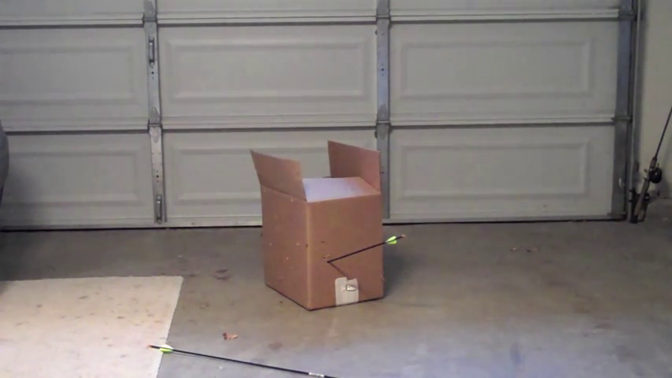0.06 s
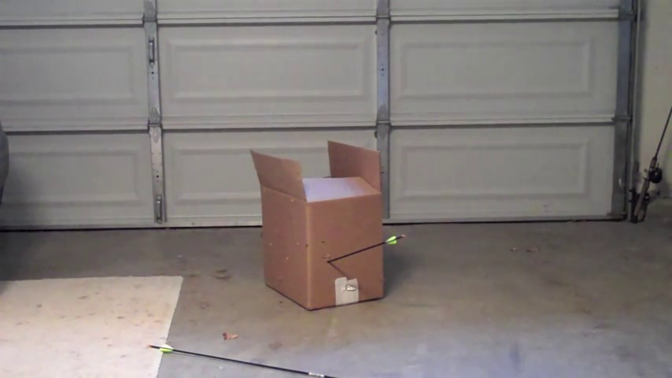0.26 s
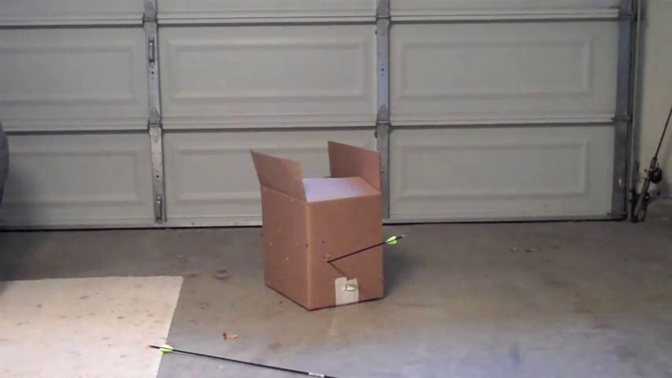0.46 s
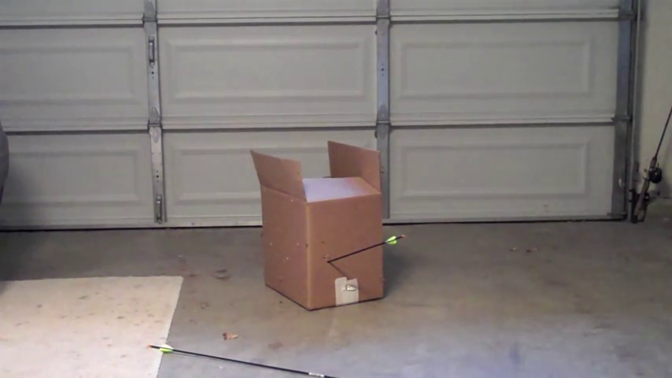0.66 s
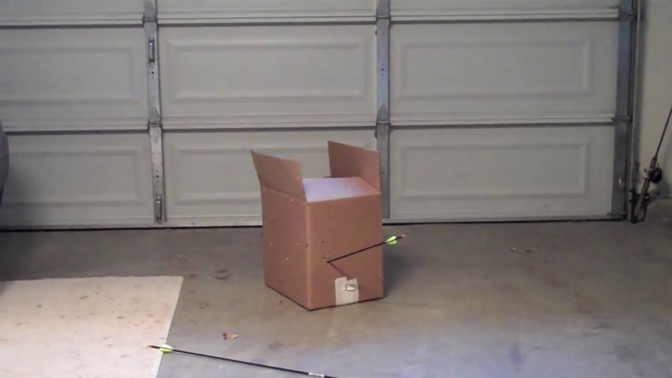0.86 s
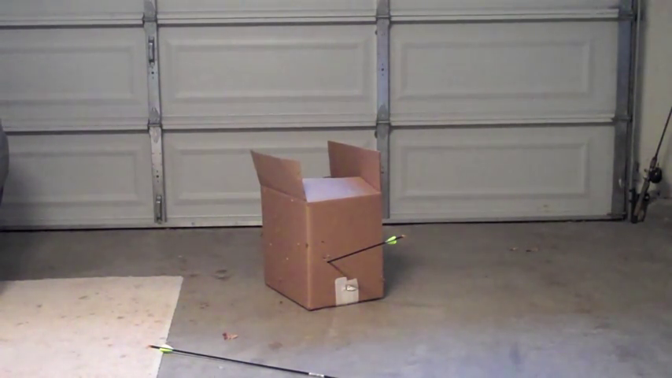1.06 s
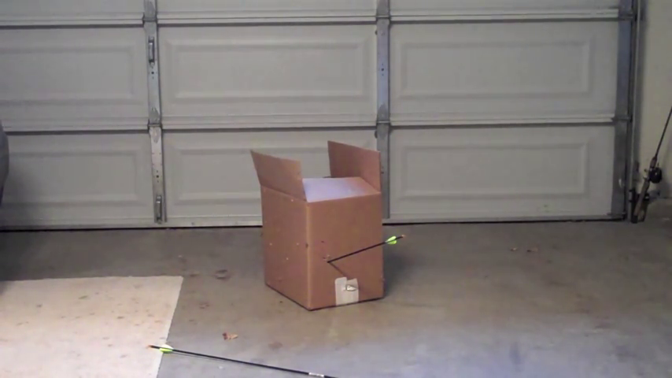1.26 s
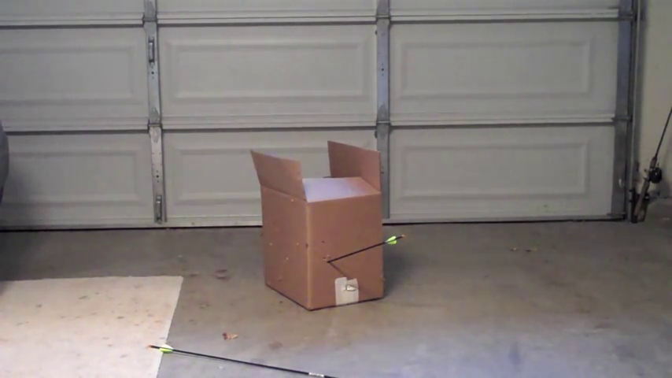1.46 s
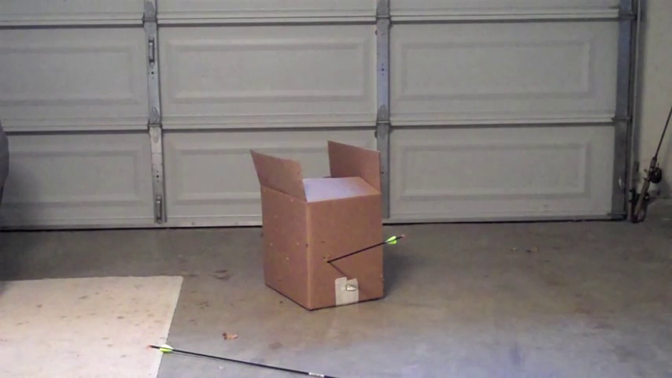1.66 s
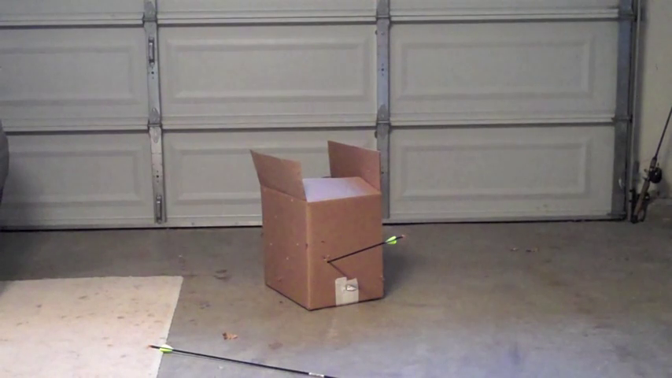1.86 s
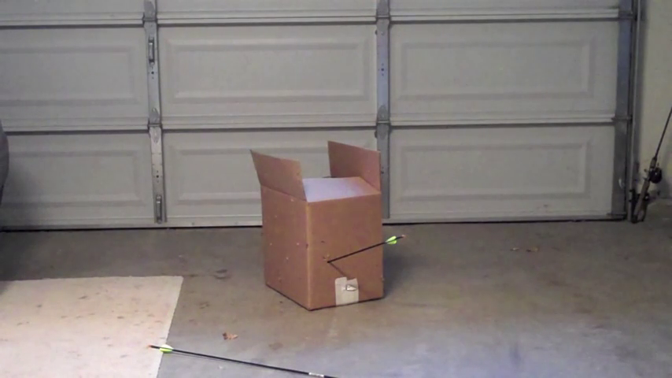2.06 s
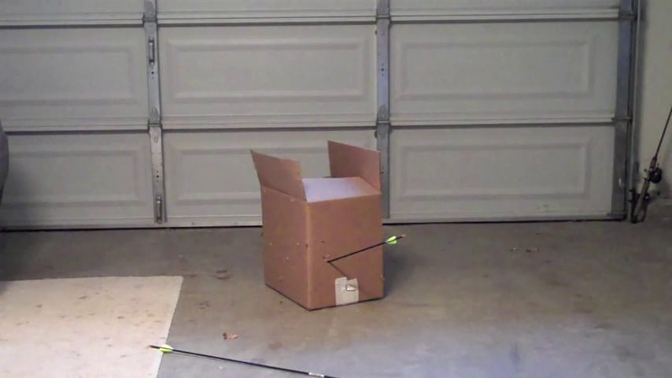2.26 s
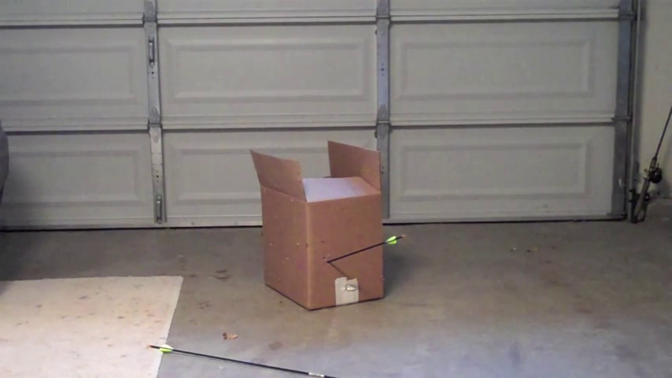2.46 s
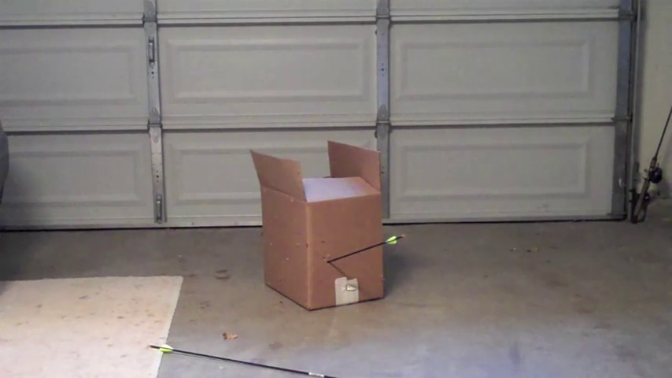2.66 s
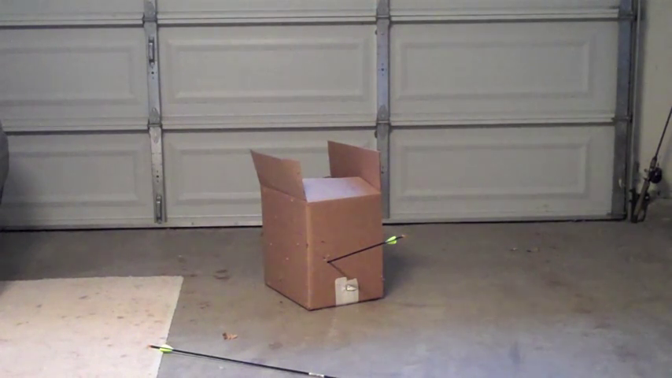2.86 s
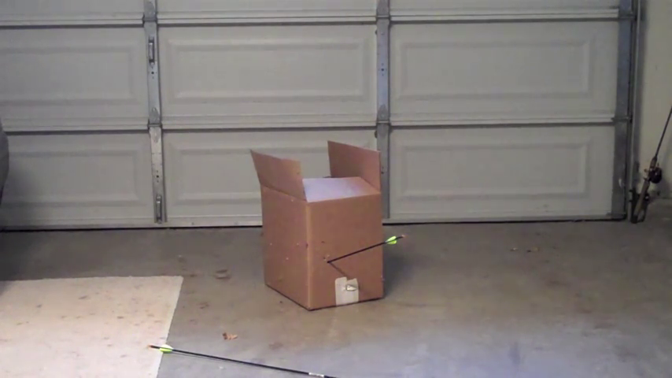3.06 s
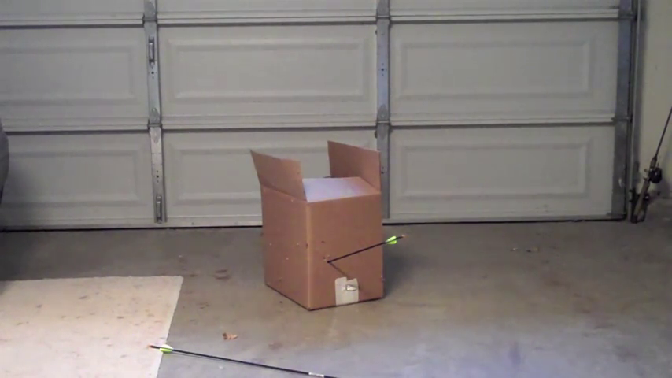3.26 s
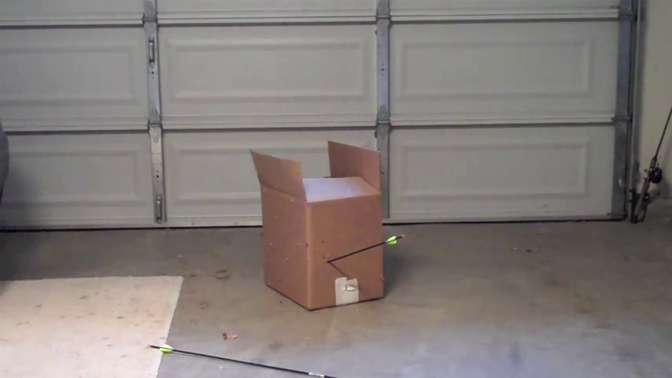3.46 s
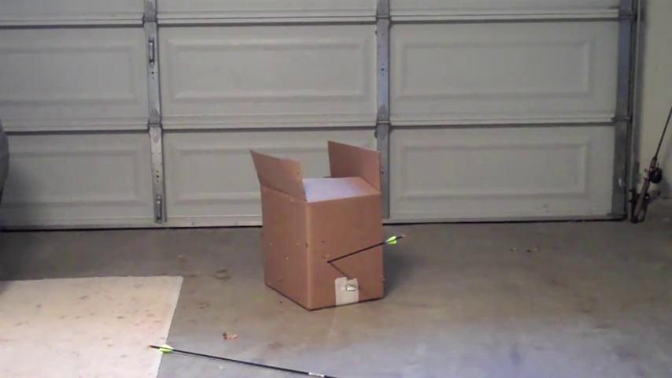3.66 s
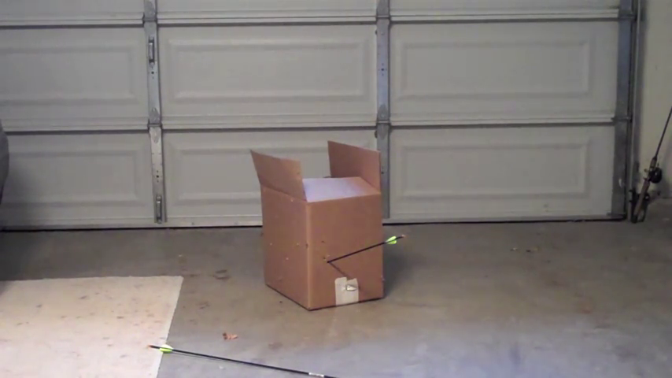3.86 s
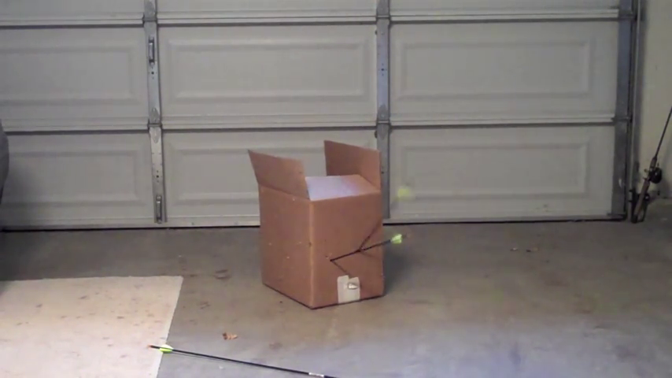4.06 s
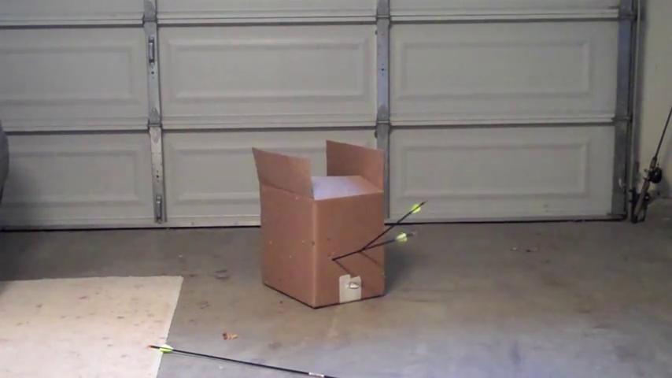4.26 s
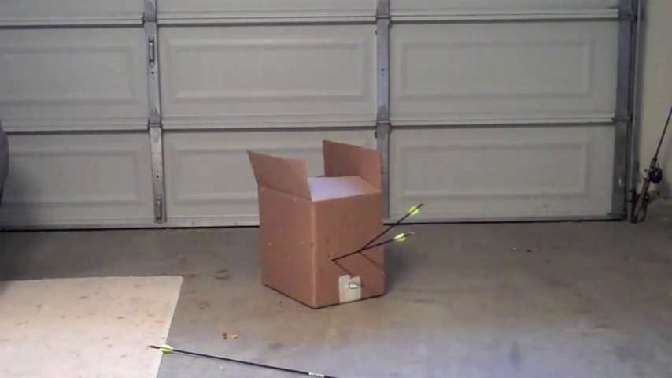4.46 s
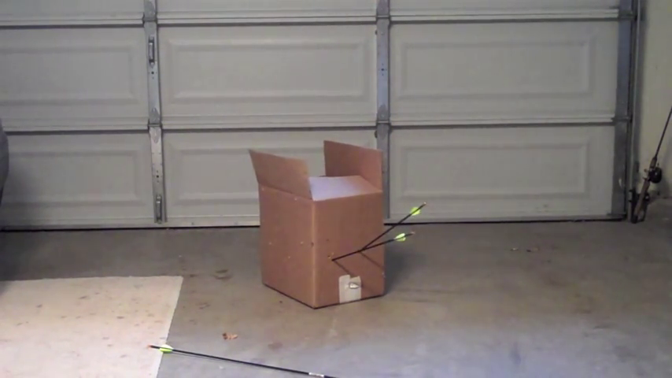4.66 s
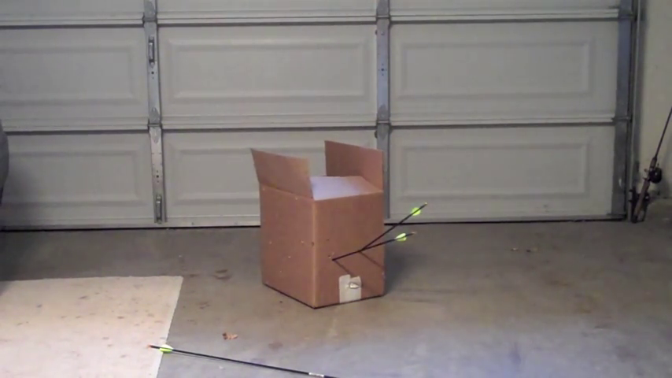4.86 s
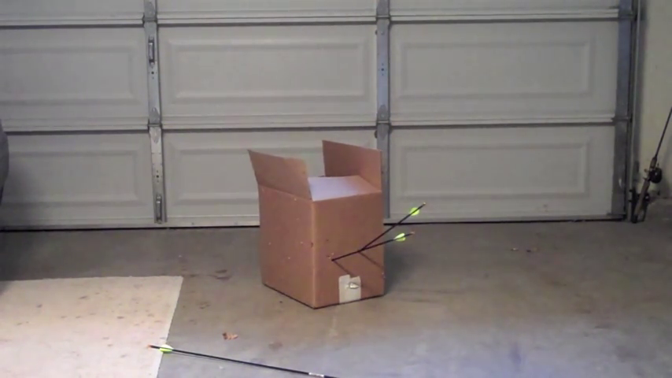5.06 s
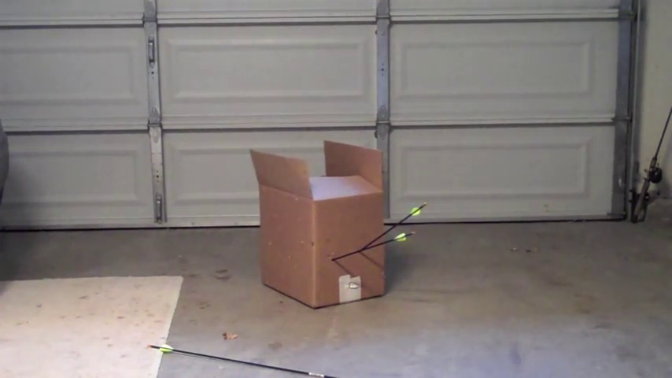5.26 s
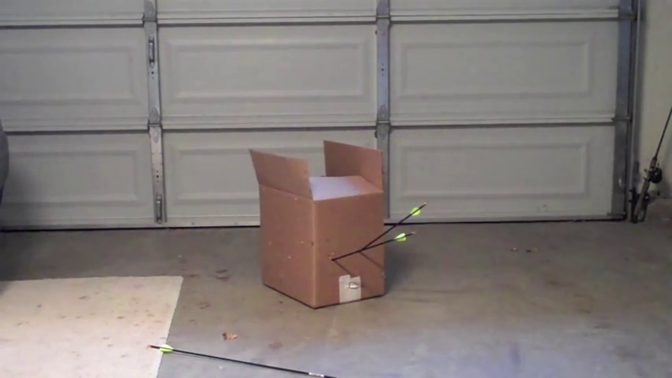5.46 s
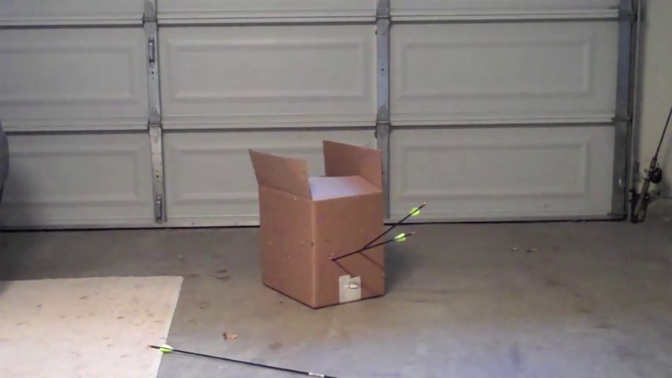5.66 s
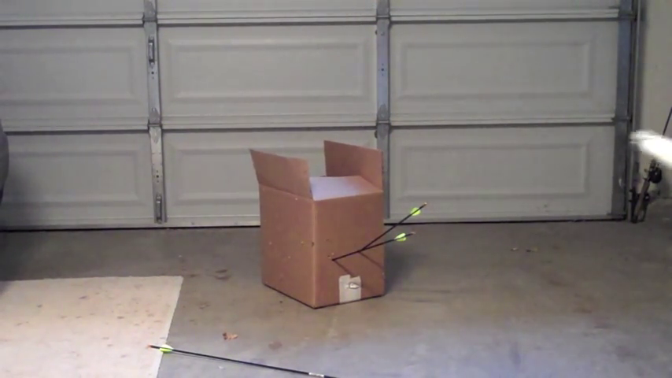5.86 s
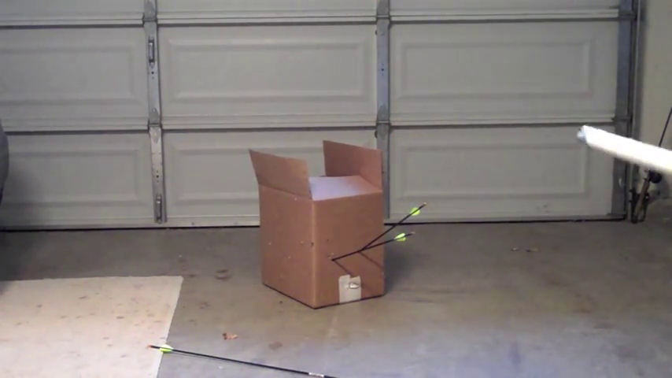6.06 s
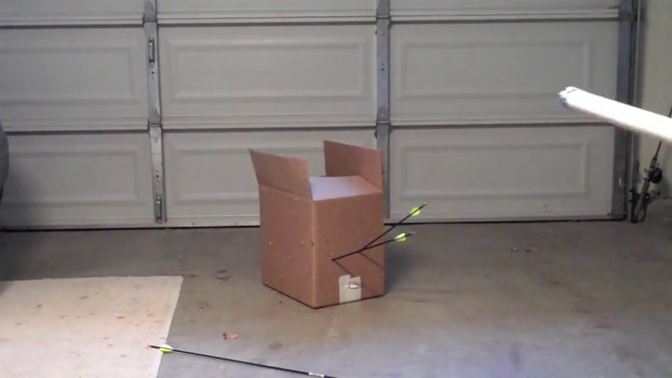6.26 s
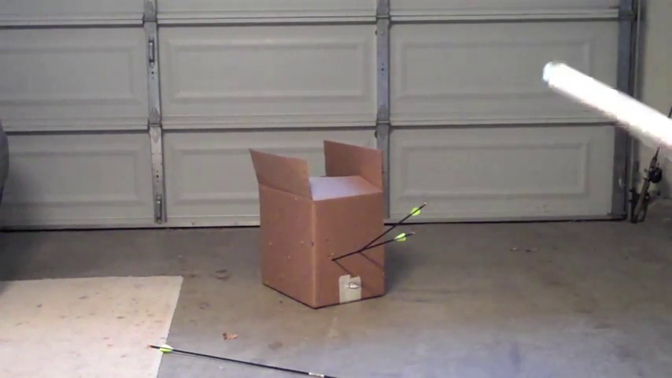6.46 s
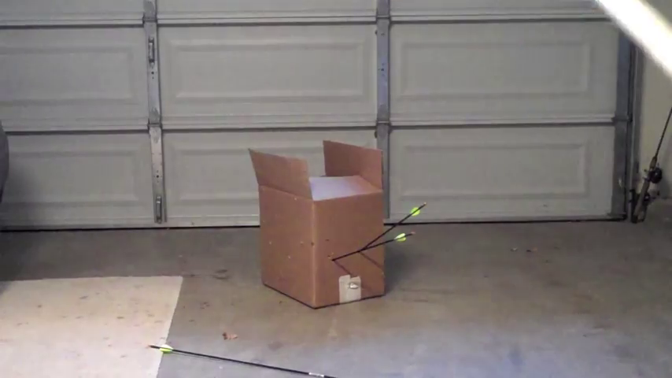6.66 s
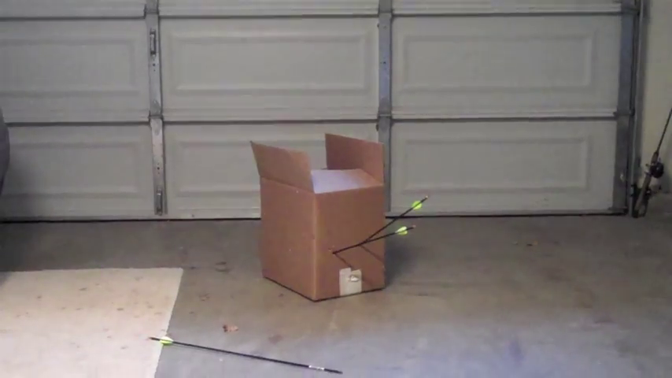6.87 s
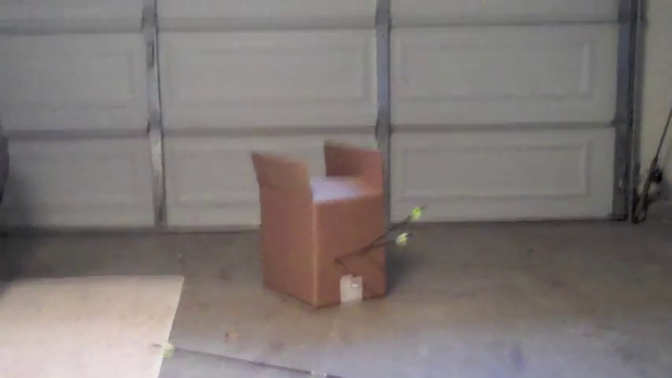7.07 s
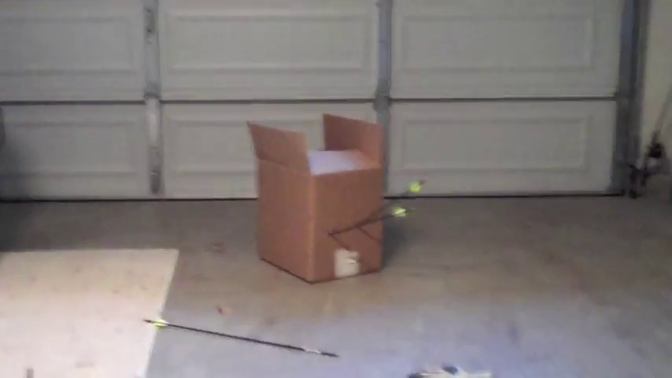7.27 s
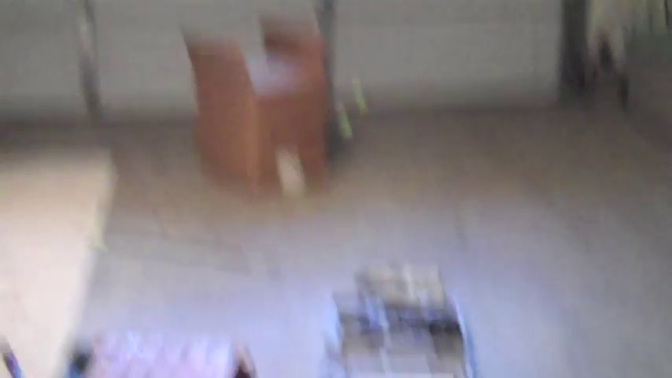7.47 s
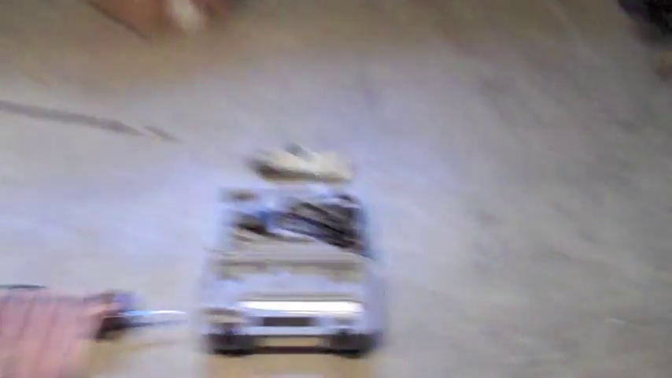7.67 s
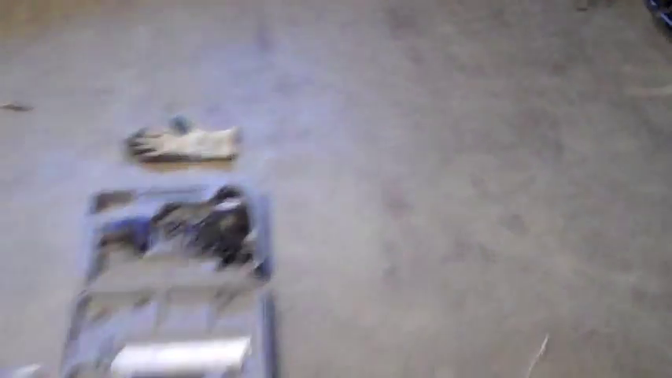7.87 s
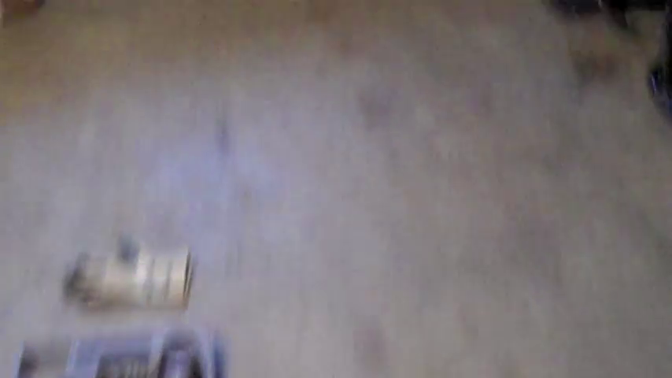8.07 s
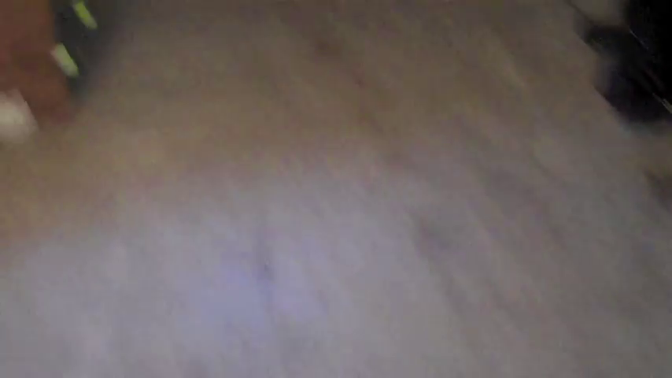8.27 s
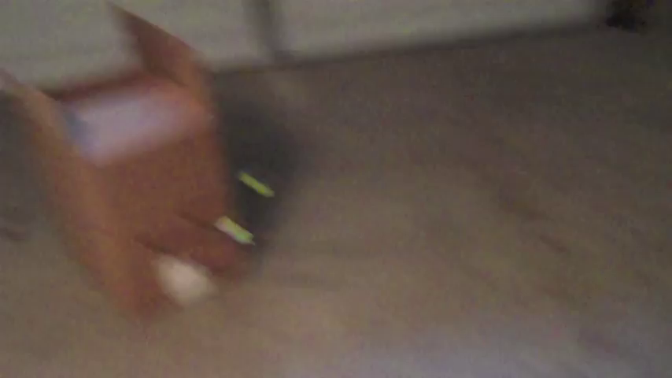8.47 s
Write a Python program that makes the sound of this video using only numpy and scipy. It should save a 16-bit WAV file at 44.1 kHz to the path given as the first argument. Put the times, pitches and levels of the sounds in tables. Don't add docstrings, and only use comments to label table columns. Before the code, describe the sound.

A quiet, hissy garage heard by a small handheld camera. Across the room a launcher clicks and a shaft rattles in a plastic pipe while clothes rustle. A sharp snap, then an arrow punches a cardboard box with a huge, boxy, reverberant smack. The sound ducks, hiss slowly returns, the box taps back onto the floor, sleeves rustle, and finally hands creak and snap the camera case right at the microphone.

```python
import sys
import numpy as np
from scipy import signal
from scipy.fft import rfft, irfft, next_fast_len
from scipy.io import wavfile
from scipy.ndimage import uniform_filter1d

SR = 44100
rng = np.random.default_rng(int(sys.argv[2]) if len(sys.argv) > 2 else 0)


def rack_gain(trim_db):
    fader = np.asarray(trim_db, float)
    return 10 ** (fader / 20)


def file_out(sig):
    cols = np.atleast_2d(sig).T
    lim = np.clip(cols, -1, 1)
    pcm = np.round(lim * 32767).astype(np.int16)
    wavfile.write(sys.argv[1], SR, pcm)


N = 375732


def unit(x):
    return x / np.sqrt(np.mean(x ** 2) + 1e-20)


def crest(x):
    return x / np.abs(x).max()


def add(into, x, s):
    part = into[round(s * SR):][:len(x)]
    part += x[:len(part)]


def along(points, hz):
    f, v = np.transpose(points)
    return np.interp(np.log(hz + 1), np.log(f + 1), v)


def curve(rows):
    s, db = np.transpose(rows)
    return np.interp(np.arange(N) / SR, s, db, left=-120, right=-120)


def filtered(x, response):
    m = next_fast_len(len(x) + 4096)
    return irfft(rfft(x, m) * response(np.fft.rfftfreq(m, 1 / SR)), m)[:len(x)]


def modes(rows):
    def response(f):
        total = 0
        for k, (hz, width, db) in enumerate(rows):
            total = total + (-1) ** k * rack_gain(db) * 1j * f * width / (hz * hz - f * f + 1j * f * width)
        return total
    return response


def resonance(hz, width):
    return modes([(hz, width, 0)])


def burst(t60, seconds):
    n = int(seconds * SR)
    x = rng.standard_normal(n) * rack_gain(-60 * np.arange(n) / SR / t60)
    return x / np.linalg.norm(x)


def impulse(response):
    x = filtered(np.arange(2048) == 64, response)
    return x / np.linalg.norm(x)


def noise(spectrum, patchy_db):
    z = signal.stft(rng.standard_normal(N), nperseg=256)[2]
    field = uniform_filter1d(rng.standard_normal(z.shape), size=8, axis=0)
    field = uniform_filter1d(field, size=6, axis=1)
    x = signal.istft(z * rack_gain(patchy_db * unit(field)), nperseg=256)[1][:N]
    return unit(filtered(x, lambda hz: rack_gain(along(spectrum, hz))))


def soft(x):
    return filtered(x, lambda f: 1 / (1 + 1j * f / 11000 - (f / 11000) ** 2) ** 2)


def ringing(rows, swell_s):
    out, t = np.zeros(N), np.arange(SR) / SR
    for s, hz, db, t60 in rows:
        envelope = rack_gain(db - 60 * t / t60) * (1 - np.exp(-t / swell_s))
        add(out, envelope * np.sin(2 * np.pi * hz * t), s)
    return out


# hz, t60_s
GARAGE_DECAY = [(90, 0.25), (180, 0.48), (300, .66), (700, .7), (1100, .67), (2300, 0.61), (3600, .65),
                (5000, 0.52), (8000, 0.4), (13000, 0.24)]


def echo(x):
    build_s = 0.0021
    hz, t, z = signal.stft(rng.standard_normal(SR), SR, nperseg=512)
    tail = signal.istft(z * rack_gain(-60 * t / along(GARAGE_DECAY, hz)[:, None]), SR, nperseg=512)[1]
    tail = tail * (1 - np.exp(-np.arange(len(tail)) / SR / build_s))
    return signal.fftconvolve(x, tail / np.linalg.norm(tail))


# hz, level_db (per Hz)
AIR = [(12, -34), (20, -8), (86, -18.5), (134, -18.5), (181, -20), (214, -18.5), (252, -20), (517, -20),
       (561, -19), (610, -21), (700, -17.5), (10700, -33.5), (14500, -49)]
# time_s, level_db
SWAY = [
    (5.25, -85),
    (5.45, -62),
    (5.6, -66),
    (5.7, -85),
]


def still_air():
    flutter = noise([(12, -40), (30, -3), (70, -3), (150, -40), (300, -120)], patchy_db=1.5)
    return rack_gain(-67.5) * noise(AIR, patchy_db=1.66) + rack_gain(curve(SWAY)) * flutter


# time_s, pressure_db
RUB = [
    (6.5, -68.5),
    (6.75, -63.5),
    (6.84, -42.5),
    (6.95, -52),
    (7.27, -79),
    (7.48, -60),
    (7.86, -70.5),
    (7.93, -75),
    (8.52, -73),
]


def follower(db):
    pressure_db = curve(RUB)
    return rack_gain(db + 0.4 * (pressure_db + 65.5)) * (pressure_db > -100)


# start_s (middle of the swell), swell_s, hold_s, swish_db, scuff_over_swish_db
MOVES = [(0, 0.0034, .03, -62, -13), (0.069, 0.073, 0.065, -54.5, -8.5), (0.185, 0.065, .008, -57, 3),
         (1.3, .011, .002, -79, -20), (1.438, 0.044, 0.0018, -73, 6.5), (2.634, 0.011, 0.038, -55.5, -2),
         (3.735, 0.023, .002, -53.5, -8), (3.87, 0.051, .002, -40, -4), (5.0, 0.29, 0.0099, -65.5, -1),
         (5.4, .02, 0.051, -65, -3.5), (5.35, 0.25, 0.016, -60, -4.5), (5.698, 0.22, 0.039, -59.5, -5),
         (5.95, 0.16, 0.0048, -61, -9), (6.122, 0.057, 0.056, -59.5, -1.5), (6.216, 0.099, 0.064, -59, -7),
         (6.417, 0.14, 0.044, -71, -5), (8.332, 0.15, 0.048, -65, 13)]


def movements():
    swell_db, fade_db_per_s = 22, 105
    t, swish, scuff = np.arange(N) / SR, np.zeros(N), np.zeros(N)
    for s, rise, hold, db, scuff_db in MOVES:
        top = s + rise
        times = [s - rise, top, top + hold, top + hold + 1]
        levels = [-2 * swell_db, 0, 0, -fade_db_per_s]
        shape = rack_gain(db + np.interp(t, times, levels, left=-120))
        swish = np.hypot(swish, shape)
        scuff = np.hypot(scuff, rack_gain(scuff_db) * shape)
    return swish, scuff


# hz, level_db (per Hz)
SWISH = [(1180, -12), (2000, -0.5), (7660, -2.5), (13000, -11), (14000, -8), (14500, -33.5)]
# hz, level_db (per Hz)
SCUFF = [(240, -45), (400, -7), (637, -1.5), (723, 0.5), (1150, 1.5), (1680, 1.5), (5000, -15.5),
         (6500, -31), (11000, -120)]


def clothes():
    swish, scuff = movements()
    swish = np.hypot(swish, follower(-64.5))
    scuff = np.hypot(scuff, follower(-69))
    return swish * noise(SWISH, patchy_db=2.5) + scuff * noise(SCUFF, patchy_db=1.5)


# time_s, peak_db, tick_hz, echo_db, echo_treble_db
CLICKS = [(0.0317, -43.5, 2620, 0, -13), (0.1412, -48.5, 3000, -3, 6), (0.2377, -35.5, 5470, -4, -17),
          (0.5131, -31, 7560, -3, -4.5), (0.7269, -31.5, 7350, -3, -5), (0.8926, -32.5, 6900, -1, -4.5),
          (1.305, -54, 6000, -9, 3), (1.49, -51.5, 1490, -3, -15), (1.5264, -30, 7560, -8.5, 1.5),
          (1.773, -42.5, 3540, -7, -17), (3.4018, -32, 3830, 1.5, -5), (3.4045, -41, 8000, -6, -3),
          (3.7185, -60, 8000, -6, 0), (5.4561, -52, 2800, -13, -10.5), (5.9546, -50, 3006, -2, -15),
          (6.007, -49, 2300, -9, -10), (6.035, -46, 6980, -7, -1), (6.1604, -47, 2500, 3.5, -5)]


def launcher():
    out = np.zeros(N)
    bright = resonance(8500, 5000)
    for s, db, tick_hz, echo_db, high_db in CLICKS:
        latch = resonance(tick_hz, 0.8 * tick_hz)
        tick = filtered(burst(0.0027, .02), lambda f: latch(f) ** 2 + rack_gain(high_db - 7.5) * bright(f) ** 2)
        colour = [(300, -31.5), (900, -10.5), (1400, -3), (2050, 1.5), (2600, -2.5), (3700, 1.5),
                  (8000, high_db), (14000, high_db - 12)]
        body = impulse(lambda f: rack_gain(along(colour, f)))
        add(out, rack_gain(db + 4) * crest(tick), s)
        add(out, rack_gain(db + echo_db + 16.5) * echo(body), s)
    return out


# time_s, peak_db, tick_db, echo_db, tilt_db_per_khz
RATTLE = [(1.5264, -52.5, -10, 10, -4), (1.7726, -47, -22, -2, -1), (2.0667, -34.5, -13, 1, 0.3),
          (2.0742, -37, -6, -3, 0.5), (2.1916, -32.5, -14, -7.5, 0), (2.1974, -41, -8, -1.5, -.4),
          (2.294, -37, -1.5, -4, 0), (2.301, -43, -9, -3.5, 0.5), (2.37, -35, -1.5, -5, 0.3),
          (2.3765, -43, -4, -3, 1), (2.486, -46, 1.5, -1, -0.8)]
# pitch_hz, width_hz, level_db
PIPE = [(1433, 110, -2), (2075, 130, 1), (2840, 150, -3), (3080, 80, -1), (3520, 200, -3), (4510, 200, -5),
        (5160, 150, -10), (5800, 150, -7), (6600, 150, -9), (8100, 250, -12), (8820, 200, -16),
        (9530, 270, -19)]


def pipe():
    out = np.zeros(N)
    contact, bright = resonance(3200, 4500), resonance(7000, 8000)
    for s, db, tick_db, echo_db, tilt_db in RATTLE:
        rungs = []
        for hz, width, level_db in PIPE:
            struck_db = level_db + tilt_db * hz / 1000 + rng.normal(0, 2)
            rungs.append((hz * rng.normal(1, .008), 1.1 * width, struck_db))
        ladder = modes(rungs)
        ring = crest(impulse(lambda f: ladder(f) + .33 * np.abs(contact(f))))[64:]
        tick = crest(filtered(burst(0.0034, .02), lambda f: bright(f) ** 2))
        add(out, rack_gain(db) * ring, s)
        add(out, rack_gain(db + tick_db) * tick, s)
        add(out, rack_gain(db + echo_db + 14.5) * echo(ring / np.linalg.norm(ring)), s)
    return out


# start_s, pitch_hz, level_db, t60_s
RINGS = [(2.0672, 2110, -42, 0.062), (5.4565, 2300, -43, 0.0068), (6.8365, 1264, -35, .03),
         (2.158, 2120, -47, 0.049), (8.194, 526, -45, 0.056), (7.3195, 930, -36, 0.04),
         (7.33, 1167, -28.5, 0.025), (7.3855, 655, -33, 0.092), (7.3848, 1400, -23, 0.03),
         (7.395, 1440, -33, .06), (7.4345, 770, -34, 0.056), (7.5095, 593, -38, 0.025),
         (7.832, 150, -44, 0.049), (8.193, 899, -38.5, 0.027)]


def clear_notes():
    return ringing(RINGS, swell_s=0.00015)


# start_s, peak_db, t60_s
RELEASE = [
    (8.6, -44.5, 0.034),
    (4.6, -38, .02),
    (3.755, -29.5, 0.03),
    (3.7751, -17.5, 0.006),
    (3.775, -27.5, 0.056),
]
# hz, level_db (per Hz)
SNAP = [(88, -62), (150, -33.5), (182, -11.5), (329, -8.5), (551, -8.5), (1100, -12.5), (1900, -9.5),
        (7860, -8), (13700, -17), (14500, -40)]


def release():
    near, far = np.zeros(N), np.zeros(N)
    crack = modes([(7430, 6000, 0), (1800, 1500, -9)])
    for s, db, t60 in RELEASE:
        add(near, rack_gain(db) * crest(filtered(burst(t60, .05), crack)), s)
        add(far, rack_gain(db + 14) * echo(impulse(lambda f: rack_gain(along(SNAP, f)))), s)
    return near + far


# start_s, level_db, t60_s, dullness (0-1), echo_db
PIERCE = [
    (3.9004, -5.5, 0.031, 0.4, -2.5),
    (3.904, -2.5, 0.019, 0, 1),
    (3.909, -0.5, 0.031, 0.5, -1.5),
    (3.921, 2.5, 0.014, 0.78, -3.5),
    (3.934, -2, 0.073, 1, 0.5),
    (3.952, 0.5, .02, 1, -7),
    (3.985, -2.5, .02, 1, -6),
]
# hz, level_db (per Hz)
SMACK = [(35, -53), (60, -33.5), (185, -6.5), (321, -4), (403, -6), (556, -21), (684, -2), (1460, -11),
         (1600, -9.5), (1920, -13), (7120, -16), (12900, -26), (14500, -58.5)]
# pitch_hz, width_hz, level_db
BOX = [(194, 190, 3), (300, 38, -2), (400, 26, -3.5), (645, 80, 1.5), (1050, 100, -4), (3500, 180, -0.5),
       (6100, 1200, -3)]
# start_s, level_db
SETTLE = [
    (4.517, -39),
    (4.545, -52),
    (4.578, -42),
    (4.635, -50.5),
    (4.68, -52.5),
    (4.744, -54.5),
    (4.814, -61),
    (4.87, -64),
]
# pitch_hz, width_hz, level_db
FLAPS = [(150, 43, -6), (250, 33, -3), (321, 22, 8), (455, 24, 1.5), (702, 19.4, -7)]
# start_s, pitch_hz, level_db, t60_s
BOOMS = [(3.902, 1090, 2.5, 0.091), (3.927, 195, 8, 0.17), (3.934, 650, 9, 0.082), (3.934, 900, 6, 0.038),
         (3.948, 280, 2.5, 0.14), (3.951, 660, 6, 0.17), (3.95, 387, -.3, .38), (3.96, 699, 2, .6),
         (3.95, 507, -4, .5), (3.94, 883, -3, .45), (3.97, 312, -6, .7), (3.93, 1224, -5, .3),
         (4.13, 150, -38, 0.55), (3.95, 262, -3, .4), (3.94, 1075, -6, .3), (3.94, 950, -5, 0.29)]


def arrow():
    out, rock = np.zeros(N), np.zeros(N)
    panels, flaps, floor = modes(BOX), modes(FLAPS), resonance(370, 220)
    for s, db, t60, dull, echo_db in PIERCE:
        def colour(f):
            muffled = 1 - dull * f / (f + 1500)
            return rack_gain(along(SMACK, f)) * (1 + .8 * np.abs(panels(f))) * muffled
        tear = filtered(np.pad(burst(t60, .1), (64, 0)), colour)[64:]
        add(out, rack_gain(db + 12) * crest(tear), s)
        add(out, rack_gain(db + echo_db + 34.5) * echo(impulse(colour)), s)
    for s, db in SETTLE:
        landing = filtered(burst(0.015, .15), lambda f: flaps(f) * floor(f))
        add(rock, rack_gain(db) * crest(landing), s)
    out = filtered(out, lambda f: (1j * f / (1j * f + 110)) ** 3)
    rocking = rack_gain(7.5) * 1.1 * (rock + echo(rock)[:N])
    return out + ringing(BOOMS, swell_s=0.0015) + rocking


# start_s, peak_db, wall_hz, t60_s
CREAKS = [(6.518, -50.5, 1370, 0.017), (6.56, -49, 1330, 0.022), (6.605, -41, 980, 0.072),
          (6.646, -37, 1333, 0.058), (6.684, -39.5, 1350, 0.053), (6.736, -51.5, 328, 0.022),
          (6.804, -48, 1050, 0.063), (6.835, -32.5, 796, 0.042), (6.851, -37.5, 483, 0.047),
          (6.865, -46.5, 179, .1), (6.929, -51, 533, 0.021), (6.932, -49, 170, .05),
          (6.955, -37.5, 1000, 0.017), (6.978, -41.5, 860, 0.033), (7.012, -37, 1110, 0.061),
          (7.003, -42.5, 420, .04), (7.016, -40, 170, 0.071), (7.036, -42, 211, .06),
          (7.041, -39.5, 980, 0.034), (7.052, -43.5, 625, 0.044), (7.058, -46, 190, 0.074),
          (7.172, -44, 1214, 0.013), (7.204, -48, 509.6, 0.014), (7.3, -42, 1284, 0.034),
          (7.327, -28.5, 1110, 0.028), (7.354, -37, 780, 0.0075), (7.3845, -24, 1220, 0.038),
          (7.434, -34, 736, 0.035), (7.321, -44, 338, .04), (7.454, -42, 520, .025),
          (7.478, -44.5, 520, 0.03), (7.535, -49, 420, 0.023), (7.559, -53, 450, 0.021),
          (7.511, -45.5, 547, 0.013), (7.583, -48, 404, 0.027), (7.595, -48, 800, .015),
          (7.604, -50, 620, .015), (7.623, -51.5, 500, .02), (7.654, -45, 470, 0.035),
          (7.655, -49, 1050, .025), (7.711, -48, 800, .012), (7.739, -40.5, 1310, 0.016),
          (7.807, -47, 1250, 0.021), (7.833, -43.5, 700, 0.04), (7.86, -38.5, 999, 0.0073),
          (8.191, -41, 1000, 0.017), (8.1936, -36.5, 534.5, 0.025), (8.276, -51, 1367, 0.014)]
# pitch_hz, width_hz, level_db
WALLS = [(655, 27, 0.5), (1440, 74, -6)]


def creaks():
    out, n = np.zeros(N), int(.1 * SR)
    kick = 12
    broad, low = resonance(1000, 1400), resonance(330, 300)
    for s, db, wall_hz, t60 in CREAKS:
        spot = resonance(wall_hz, 0.4 * wall_hz)
        walls = modes([(hz, width, g + rng.normal(0, 3)) for hz, width, g in WALLS])
        slip = burst(t60, .1) * np.minimum(np.arange(n) / (0.00094 * SR), 1)
        slip[:kick] += 0.16 * np.hanning(kick)
        groan = filtered(slip, lambda f: spot(f) ** 2 + 0.62 * walls(f) * broad(f))
        thud = filtered(slip, lambda f: low(f) ** 2)
        thud_db = -53.5 + 0.55 * (db + 44.5)
        add(out, rack_gain(db) * crest(groan) + rack_gain(thud_db) * crest(thud), s)
    return out


# start_s, peak_db, top_db, spot_hz
SHELL_SNAPS = [(6.571, -43, -11, 3300), (6.6033, -38.5, 5, 3530), (6.6416, -42, 2.5, 2950),
               (6.646, -37.5, -10, 3500), (6.6652, -43, -10, 5970), (6.687, -44, -20, 3460),
               (6.8361, -24, -27, 3500), (6.9996, -30, -5, 2660), (7.033, -43, 4, 4300),
               (7.1756, -41, -12, 3500), (7.32, -30.5, -26, 3500), (7.3235, -33, -26, 3500),
               (7.3298, -24.5, -29, 4530), (7.3543, -42, 4, 4010), (7.382, -35, -14, 5500),
               (7.3847, -12, -26, 4400), (7.4342, -33, -21, 2790), (7.663, -55, 10, 3650),
               (7.7415, -36, -7, 6330), (7.8345, -38.5, 8, 3318), (8.1926, -46.5, -6, 3790),
               (8.2771, -44, -3, 2815)]
# pitch_hz, width_hz, level_db
SHELL = [(3050, 790, 2.5), (4400, 1920, 0), (6240, 1300, 1.5)]


def shell_snaps():
    out, n = np.zeros(N), int(.05 * SR)
    broad, treble = resonance(4800, 5000), resonance(9500, 5000)
    for s, db, top_db, spot_hz in SHELL_SNAPS:
        t60 = 0.0069 * rack_gain(0.29 * (db + 46))
        shell = modes([(hz, width, g + rng.normal(0, 1)) for hz, width, g in SHELL])
        spot = resonance(spot_hz, 900)
        blow = 0.87 * burst(t60, .05) + (np.arange(n) == 0)
        snap = filtered(blow, lambda f: shell(f) ** 2 + 1.13 * spot(f) ** 2 + rack_gain(-5) * broad(f) ** 2)
        top = filtered(burst(0.0036, .05), lambda f: treble(f) ** 2)
        add(out, rack_gain(db - 1.5) * (crest(snap) + rack_gain(top_db) * crest(top)), s)
    return out


def crackle(rate):
    sizes = rng.standard_normal(N) * rack_gain(5.1 * rng.exponential(size=N))
    grains = (rng.random(N) < rate / SR) * sizes
    walls = modes([(490, 550, 1), (770, 305, 0.5), (1050, 360, -1.5), (1430, 90, -17)])
    return unit(filtered(np.clip(grains, -8, 8), lambda f: walls(f) ** 2))


# hz, level_db (per Hz)
RUMBLE = [(29, -50), (50, -25), (156, -6), (198, -6), (436, -14.5), (486, -6), (900, -16), (1170, -21),
          (1980, -120)]


def palm():
    lag_s = 0.11
    weight = np.roll(follower(0) ** 1.58, round(lag_s * SR))
    weight = weight * (np.arange(N) > N // 2)
    return rack_gain(-68) * weight * noise(RUMBLE, patchy_db=4) + follower(-67) * crackle(rate=300)


# time_s, level_db
SCRAPE = [
    (7.252, -83.5),
    (7.268, -63),
    (7.3, -54),
    (7.325, -44.5),
    (7.345, -47),
    (7.36, -80),
]
# hz, level_db (per Hz)
SQUEAK = [(600, -20.5), (1100, -9), (1330, 1.5), (1600, -9), (2600, -29)]


def grip():
    knocks = creaks() + shell_snaps()
    fingertip = rack_gain(curve(SCRAPE)) * noise(SQUEAK, patchy_db=3.5)
    return knocks + rack_gain(-17) * echo(knocks)[:N] + palm() + fingertip


def scene():
    room = still_air() + clothes() + launcher() + soft(pipe()) + clear_notes()
    shot = release() + arrow()
    return (room + shot + soft(grip()))[None]


# time_s, change_db
DUCKS = [
    (3.776, -.75),
    (3.9006, -9),
    (3.905, -4),
    (3.922, -3),
    (3.936, -1.75),
    (7.386, -.75),
]
# last_step_s, total_db, step_db
CLIMBS = [
    (5.5348, 18.5, .5),
    (7.7405, .75, .75),
]


def gain_db():
    step_s = .03415
    jumps = np.zeros(N)
    for s, db in DUCKS:
        jumps[round(s * SR)] += db
    for last, total, step in CLIMBS:
        times = last - step_s * np.arange(round(total / step))
        jumps[np.round(times * SR).astype(int)] += step
    return np.cumsum(jumps)


def low_pass(x):
    return signal.sosfilt(signal.butter(12, 14780, fs=SR, output="sos"), x)


def record(dry):
    gain = rack_gain(gain_db())
    offset = uniform_filter1d(0.11 * (gain - gain[0]), size=10)
    bumps = filtered(offset, lambda f: 1j * f / (1j * f + 1.7))
    hiss = rack_gain(-76.5) * noise(AIR, patchy_db=-0.5)
    x = gain * dry[0] + bumps - .0005 + hiss
    x = x / (1 + np.abs(x / .97) ** 6) ** (1 / 6)
    x = filtered(x, lambda f: 1 / (1 + (f / 13900) ** 60))
    return low_pass(x[None])


dry = scene()
out = record(dry)
file_out(out)
```